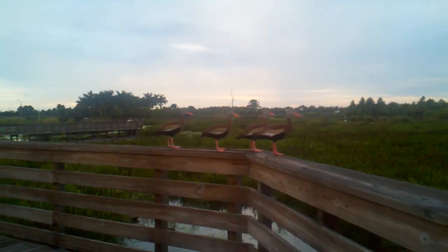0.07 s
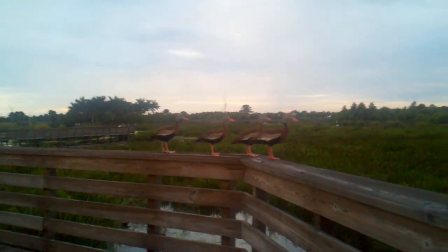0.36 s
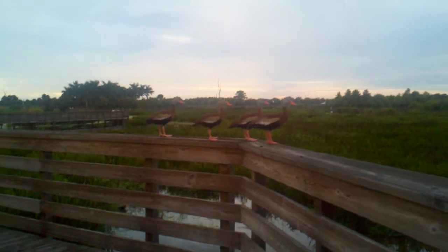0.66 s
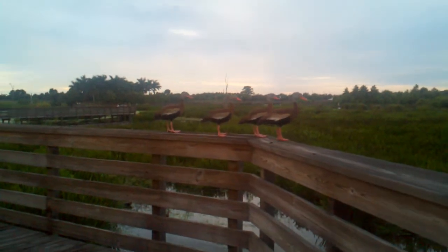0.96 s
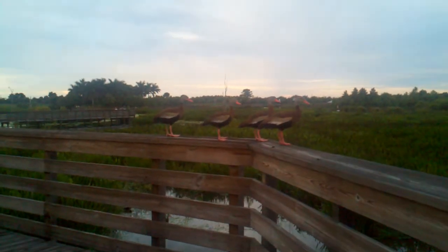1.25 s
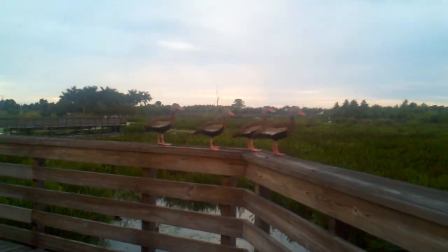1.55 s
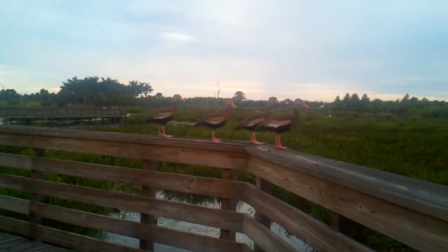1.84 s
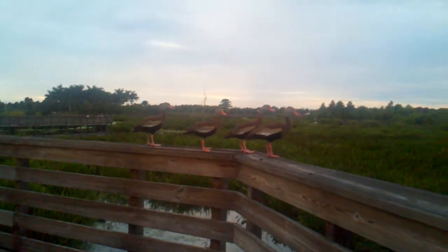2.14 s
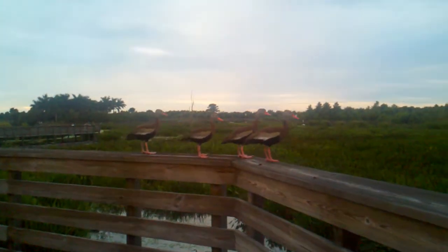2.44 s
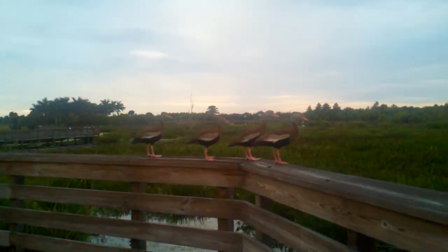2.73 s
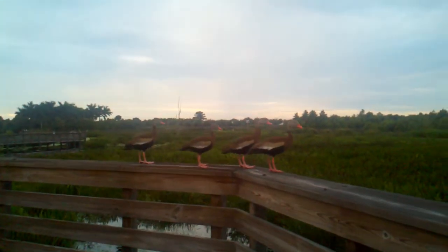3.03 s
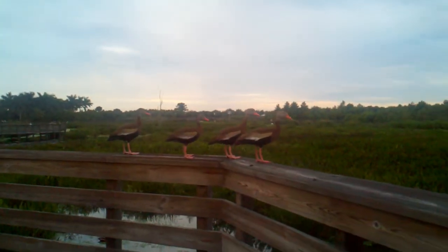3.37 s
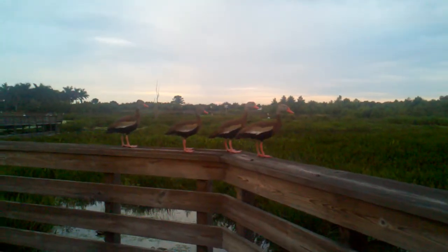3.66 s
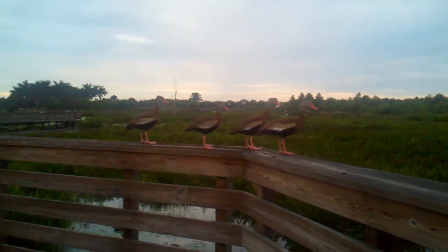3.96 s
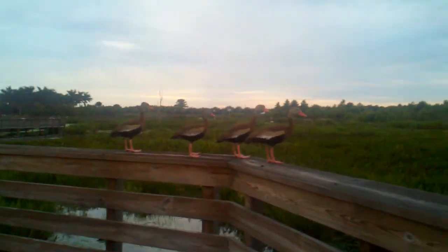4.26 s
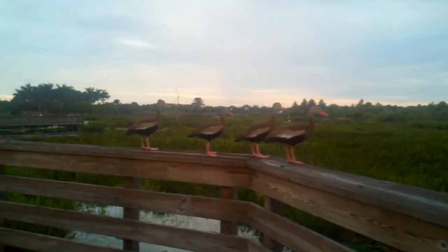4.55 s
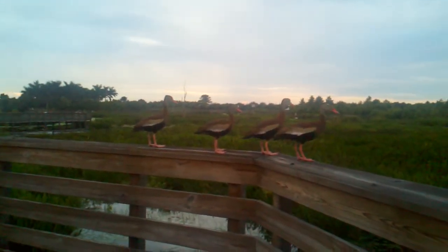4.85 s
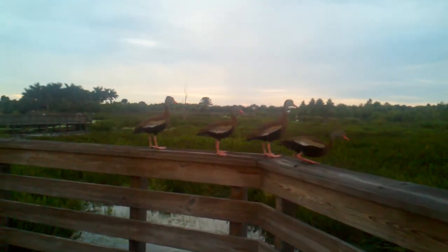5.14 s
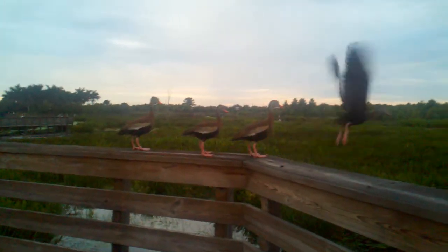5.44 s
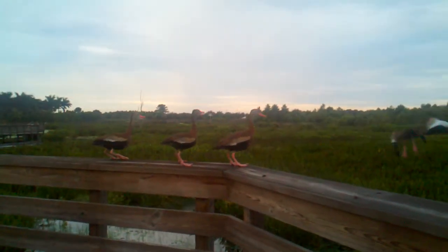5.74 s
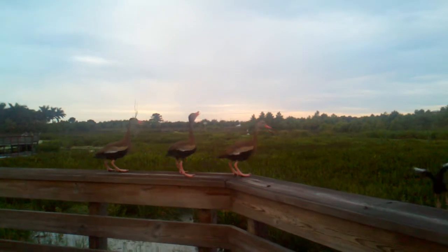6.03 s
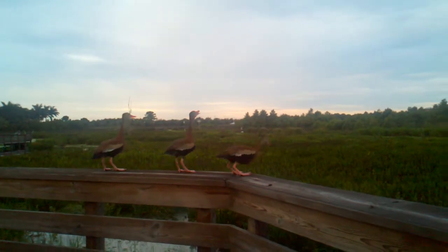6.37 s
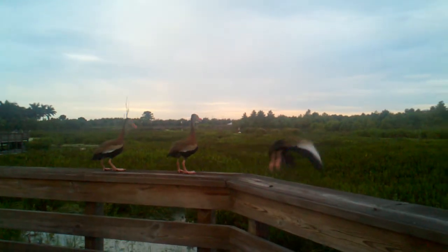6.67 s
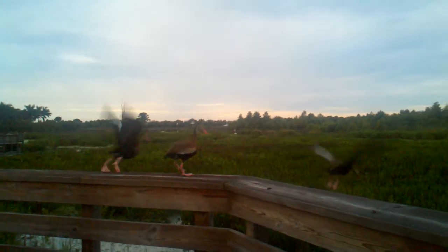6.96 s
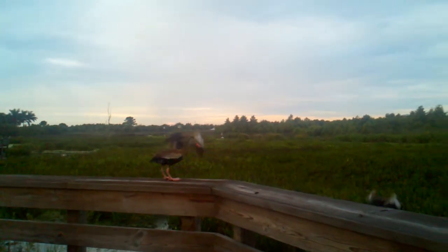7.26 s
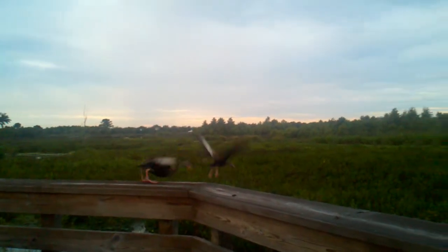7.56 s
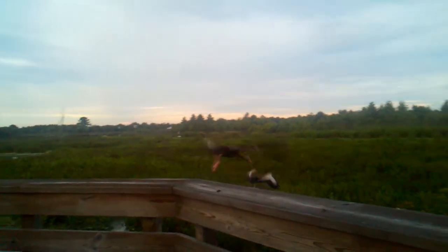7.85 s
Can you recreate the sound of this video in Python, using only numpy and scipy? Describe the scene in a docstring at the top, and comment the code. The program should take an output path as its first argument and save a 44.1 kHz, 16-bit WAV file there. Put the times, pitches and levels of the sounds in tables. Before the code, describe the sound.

A quiet outdoor marsh holds a low distant rumble, steady shrill insects and a faint, far rattling bird. About halfway through, a duck draws out one thin rising whistle. Then several ducks close to the microphone call at once in loud, quick whistles and raspy chirps, with a few light knocks and wing claps over a soft wash of noise. The calls thin out and fade at the end.

```python
"""A marsh at dusk: low distant rumble, shrill insects and a far rattling bird. Then whistling ducks on a
boardwalk rail: one long rising whistle, and all call at once as they fly off, over a soft wash of noise.
Each side of a duck's syrinx can sound its own pitch: one side alone gives a whistle; when both sound,
they mix into sum and difference tones. Deck, rails and reeds add a short echo."""
import sys
import numpy as np
from scipy import signal
from scipy.fft import rfft, irfft, next_fast_len
from scipy.io import wavfile
from scipy.ndimage import uniform_filter1d

SR = 44100
rng = np.random.default_rng(int(sys.argv[2]) if len(sys.argv) > 2 else 0)


def waveform_to_disk(signal):
    """Save audio, clipped to [-1, 1], as 16-bit WAV at the path in sys.argv[1]."""
    frames = np.transpose(np.atleast_2d(signal))
    scaled = np.clip(frames, -1, 1) * 32767
    samples = np.round(scaled).astype(np.int16)
    wavfile.write(sys.argv[1], SR, samples)


N = 357210
TIME, BINS = np.arange(N) / SR, np.fft.rfftfreq(N, 1 / SR)


def amp(db):
    """Decibels to gain."""
    return 10 ** (np.asarray(db) / 20)


def unit(x):
    """Scales to rms 1."""
    return x / np.sqrt(np.mean(x ** 2) + 1e-20)


def curve_at(points, hz):
    """Reads a curve on a log-frequency axis."""
    freqs, values = np.transpose(points)
    return np.interp(np.log(hz + 1), np.log(freqs + 1), values)


def add(mix, start, sound):
    """Mixes a sound in at a start time in seconds."""
    part = mix[round(start * SR):][:len(sound)]
    part += sound[:len(part)]


def noise(gain):
    """Noise of rms 1, shaped by a gain for each frequency."""
    return unit(irfft(rfft(rng.standard_normal(N)) * gain, N))


def noise_band(hz, width_hz):
    """A bell-shaped band of noise, rms 1."""
    return noise(np.exp(-((BINS - hz) / width_hz) ** 2 * 2))


def flutter(t, rate_hz):
    """A random modulator of rms about 1 that rolls off above the rate."""
    size = next_fast_len(len(t) + 4096)
    lowpass = np.exp(-(np.fft.rfftfreq(size, 1 / SR) / rate_hz) ** 2)
    return unit(irfft(rfft(rng.standard_normal(size)) * lowpass, size))[:len(t)]


def gesture(start, length, attack=.01, release=.008):
    """Times, progress 0-1 and a soft on-off gate of one call."""
    t = np.arange(0, length, 1 / SR)
    ramp = np.clip(np.minimum(t / attack, (length - t) / release), 0, 1)
    return start + t, t / length, np.sin(np.pi / 2 * ramp) ** 2


def arch(progress, crest, first, top, last, rise=1.7, fall=2.1):
    """Bends from first to top at the crest, then to last; a power of 1 is straight, 2 a parabola."""
    crest = np.clip(crest, .02, .98)
    before = np.maximum(1 - progress / crest, 0)
    after = np.maximum((progress - crest) / (1 - crest), 0)
    return top + (first - top) * before ** rise + (last - top) * after ** fall


def swell(progress, loudest, db, onset_db, ending_db):
    """Level envelope of a call; onset and ending are relative to its loudest moment."""
    return db + arch(progress, loudest, onset_db, 0, ending_db, rise=1.43, fall=1.48)


def membrane(t, hz, db, jitter, shimmer_db, rate_hz):
    """Phase and amplitude of one vibrating membrane, unsteady in pitch and strength."""
    phase = 2 * np.pi * np.cumsum(hz * (1 + jitter * flutter(t, rate_hz))) / SR
    return phase, np.sqrt(2) * amp(db + shimmer_db * flutter(t, rate_hz))


# EQ of the distant rumble: (frequency [Hz], relative level [dB])
RUMBLE_EQ = [(15, -59), (25, -20.5), (43, -18), (86, -13.5), (108, 1.5), (141, -4.5), (284, -1), (455, -3),
             (509, -2.5), (583, -3.5), (1600, -13), (2690, -15), (5400, -22.5), (7020, -57), (11900, -120)]
# fader ride of a far drone: (time [s], level [dB])
DRONE_RIDE = [(3.9, -100), (4.4, -78), (5.0, -74.5), (5.3, -86.5), (8.1, -88)]


def marsh(rumble_db=-68.5, hiss_db=-73, whine_db=-88, whine_hz=11084):
    """The bed: distant rumble, even hiss, a drone that swells once and a faint high whine."""
    ride_db = np.interp(TIME, [0, 4, 5, 7.2, 8.1], [.61, .41, 2.9, 1.83, 2.6]) + .55 * flutter(TIME, 4)
    rumble = amp(rumble_db + ride_db) * noise(amp(curve_at(RUMBLE_EQ, BINS)))
    hiss = amp(hiss_db) * noise(BINS > 5000)
    drone = amp(np.interp(TIME, *np.transpose(DRONE_RIDE))) * noise_band(325, 35)
    whine = np.sqrt(2) * amp(whine_db) * np.sin(2 * np.pi * whine_hz * TIME)
    return rumble + hiss + drone + whine


# shrill insect chorus and faint low hums: (centre [Hz], width [Hz], level [dB])
INSECT_BANDS = [(6373, 610, -70), (8770, 1600, -84)]
HUM_BANDS = [(118, 16, -85.5), (249, 46, -83.5)]


def insects_and_hums():
    """Steady bands of noise: insects on top, hums underneath."""
    return sum(amp(db) * noise_band(hz, width) for hz, width, db in INSECT_BANDS + HUM_BANDS)


def rattling_bird(level_db=-80.5, pulse_hz=13.5):
    """A distant bird's faint chatter: one bout of evenly pulsed noise."""
    bout = np.interp(TIME, [0, .4, 2.6, 2.7], [0, 1, 1, 0])
    pulses = np.cos(np.pi * pulse_hz * (TIME - 2.305)) ** 4
    return amp(level_db + flutter(TIME, 17)) * bout * unit(pulses) * noise_band(2320, 680)


# whistles from far over the marsh: (start [s], length [s], crest [share of length],
# first pitch [Hz], crest pitch [Hz], last pitch [Hz], starting level [dB])
FAR_CUES = [(1.689, 0.051, .6, 2820, 2630, 2500, -70), (2.982, .16, .4, 2720, 2760, 2560, -79),
            (3.079, .42, .3, 2590, 2610, 2580, -84), (5.521, 0.055, .45, 1790, 1680, 1520, -65.5),
            (7.233, 0.041, .35, 1720, 1610, 1530, -60.5), (7.7, .42, 0.22, 3320, 3326, 3040, -69),
            (7.781, .32, 0.28, 1686, 1620, 1550, -78.5)]


def far_birds(fade_db=-2.5):
    """Whistles blurred by distance: wavering sines that fade a little as they go."""
    out = np.zeros(N)
    for start, length, *contour, db in FAR_CUES:
        t, progress, gate = gesture(start, length, attack=.022, release=.02)
        hz = arch(progress, *contour)
        phase, gain = membrane(t, hz, db + fade_db * progress, jitter=.026, shimmer_db=4.5, rate_hz=350)
        add(out, start, gate * gain * np.sin(phase))
    return out


# fader ride of the noise wash: (time [s], level before trim [dB])
WASH_RIDE = [(5.3, -65), (5.48, -63.5), (5.58, -79), (5.8, -60.5), (5.98, -55), (6.05, -58.5), (6.3, -50.5),
             (6.8, -50.5), (6.9, -55), (7.12, -55.5), (7.2, -65), (7.6, -65), (7.75, -66)]
# EQ of the wash: (frequency [Hz], relative level [dB])
WASH_EQ = [(30, -16), (90, -5), (300, 3), (700, -3), (1400, -6.5), (3000, 1), (8000, -14.5), (15000, -34)]


def noise_wash(trim_db=-2):
    """A soft, unsteady wash of noise that swells under the loud calls."""
    ride_db = np.interp(TIME, *np.transpose(WASH_RIDE), left=-120, right=-120)
    return amp(trim_db + ride_db + .85 * flutter(TIME, 42.8)) * noise(amp(curve_at(WASH_EQ, BINS)))


# decay of the scatter from rails and reeds: (frequency [Hz], t60 [s])
REED_DECAY = [(300, 0.35), (3000, .55), (6000, 0.79), (14000, 0.068)]


def boardwalk_echo(dry, near_db=-14, tail_db=-21, near_t60=.194, taps_per_s=2000):
    """Adds quick reflections from the deck and rails, and a thin tail from the reeds."""
    t = np.arange(SR) / SR
    taps = rng.choice([-1., 1.], SR) * (rng.random(SR) < taps_per_s / SR) * (t > .002)
    near = taps * amp(-60 * t / near_t60)
    hz, when, spectra = signal.stft(taps[::-1], SR, nperseg=256)
    decay = amp(-60 * when / curve_at(REED_DECAY, hz)[:, None])
    tail = signal.istft(spectra * decay, SR, nperseg=256)[1][:SR]
    echo = amp(near_db) * near / np.linalg.norm(near) + amp(tail_db) * tail / np.linalg.norm(tail)
    return dry + signal.fftconvolve(dry, echo)[:N]


# ticks, foot knocks and wing claps: (time [s], peak level [dB], centre [Hz], t60 [s])
KNOCK_CUES = [(1.36, -44.5, 2120, 0.041), (1.465, -55, 1900, 0.018), (5.469, -50.5, 300, 0.28),
              (5.975, -34.5, 1530, 0.054), (6.583, -41.5, 748, 0.14), (6.617, -43, 1000, .08),
              (6.762, -47.5, 320, 0.176), (7.606, -46.5, 1350, 0.041), (7.689, -47.5, 6500, .01)]


def knocks():
    """Small impacts: dying noise bursts through one broad resonance each."""
    out, t = np.zeros(N), np.arange(SR // 8) / SR
    for start, db, hz, t60 in KNOCK_CUES:
        burst = rng.standard_normal(len(t)) * amp(-60 * t / t60)
        ring = signal.lfilter(*signal.iirpeak(hz, Q=1.8, fs=SR), burst)
        add(out, start, amp(db) * ring / abs(ring).max())
    return out


# EQ of the air that drives the calls: (frequency [Hz], relative level [dB])
BREATH_EQ = [(800, -33.5), (1400, -17), (2200, 4.5), (4000, -7), (8500, -1), (10500, -2.5), (12000, 0.5),
             (15500, -7.5)]


def breath(calls, air_db=-19.5, full_cry_db=-45.5):
    """A hiss that follows the treble of the calls, growing with how hard the flock cries."""
    treble = signal.sosfilt(signal.butter(4, 4200, "high", fs=SR, output="sos"), calls)
    cry = np.sqrt(abs(uniform_filter1d(uniform_filter1d(treble ** 2, size=1100), size=1100)))
    drive = np.clip(cry / amp(full_cry_db), .2, 1)  # soft whistles stay clean
    return amp(air_db) * cry * drive * noise(amp(curve_at(BREATH_EQ, BINS)))


# colour that throat and bill give to overtones: (frequency [Hz], gain [dB])
THROAT_EQ = [(1200, -34), (1600, -21), (1950, -7.5), (2400, -12.5), (3300, 16), (5000, 1), (6000, -1.5),
             (7400, -.5), (9300, -3.5), (10300, -9), (11300, -18.5), (12500, -21.5), (15500, -14)]


def partial(phase, hz, waver_db=1.8, waver_hz=50):
    """One overtone or mixing tone, coloured by the throat and wavering in strength on its own."""
    db = curve_at(THROAT_EQ, abs(hz)) + waver_db * flutter(phase, waver_hz)
    return amp(db) * np.sin(phase) * (hz < SR / 2)


def harmonics(t, phase, hz, over_db, tilt_db, fray, slack_db=26):
    """The fundamental and its overtones, which build up in turn and fray more the higher they lie."""
    # a slack, low-pitched membrane closes softly: its top overtones fade
    tilt_db = tilt_db - slack_db * np.clip(np.log2(2800 / hz), 0, 1)
    build = np.minimum((t - t[0]) / .016, 1) ** .6
    overtones = 0
    for k in range(2, 7):
        gain = amp(tilt_db * max(k - 3, 0) ** 1.4) * build ** (k - 1)
        overtones += gain * partial(k * (phase + fray * flutter(t, 574)), k * hz)
    return np.sin(phase) + amp(over_db) * overtones


def whistle(t, gate, hz, db, over_db, waver_db=5, tilt_db=-2):
    """One side of the syrinx sounds alone: a clean stack that frays and brightens when driven hard."""
    effort = np.clip((np.maximum(db, over_db) + 50) / 25, 0, 1)
    phase, gain = membrane(t, hz, db + .8 * flutter(t, 30), jitter=.0016, shimmer_db=.8, rate_hz=120)
    balance_db = over_db - db + waver_db * flutter(t, 60)
    fray = .02 + .12 * effort
    return gate * gain * harmonics(t, phase, hz, balance_db, tilt_db + 1.5 * effort, fray, slack_db=7.5)


def call_shape(start, length, crest, first_hz, top_hz, last_hz, loudest, peak_db, over_peak_db):
    """One short call: times, gate, arched pitch and the envelopes of fundamental and overtones."""
    t, progress, gate = gesture(start, length)
    hz = arch(progress, crest, first_hz, top_hz, last_hz)
    db = swell(progress, loudest, peak_db, onset_db=-18.5, ending_db=-28)
    over_db = swell(progress, .45, over_peak_db, onset_db=-7.5, ending_db=-10.5)
    return t, gate, hz, db, over_db


# path of the long whistle, levels before trims:
# (time [s], pitch [Hz], fundamental [dB], second harmonic [dB])
LONG_WHISTLE_PATH = [(4.24, 1880, -83, -74), (4.294, 1680, -96, -67), (4.538, 1964, -96, -67.5),
                     (4.564, 1990, -75, -65), (4.696, 2170, -80, -59), (4.794, 2454, -66, -60.5),
                     (4.832, 2480, -63.5, -59.5), (4.854, 2512, -68, -65), (4.978, 2524, -63, -50),
                     (5.008, 2510, -57.5, -53), (5.056, 2470, -64, -50.5), (5.148, 2449, -61, -54.5),
                     (5.16, 2430, -62, -59.5), (5.224, 2380, -62, -55), (5.274, 2316, -64, -62),
                     (5.29, 2330, -70, -47)]


def long_whistle(trim_db=.5):
    """One duck draws out a thin whistle that dips, climbs and levels off."""
    out = np.zeros(N)
    times, *columns = np.transpose(LONG_WHISTLE_PATH)
    t, _, gate = gesture(times[0], times[-1] - times[0])
    hz, db, second_db = [np.interp(t, times, column) for column in columns]
    over_db = second_db - curve_at(THROAT_EQ, 2 * hz)  # offsets the throat's gain on the second harmonic
    add(out, t[0], whistle(t, gate, hz, db + trim_db, over_db + trim_db, waver_db=1.7, tilt_db=-.5))
    return out


# one-voiced calls, levels before trim and throat EQ: (start [s], length [s], crest [share of length],
# first pitch [Hz], crest pitch [Hz], last pitch [Hz], loudest moment [share of length],
# fundamental [dB], overtones [dB])
WHISTLE_CUES = [(4.097, 0.1, 0.35, 2440, 3095, 2980, 0.23, -63.0, -81.0),
                (5.197, 0.052, 0.67, 2060, 2236, 1940, 0.93, -55, -56),
                (5.253, 0.06, 0.4, 2120, 3220, 3100, 0.67, -44, -58),
                (5.28, 0.06, 0.6, 2030, 2530, 2500, 0.45, -54.5, -53),
                (5.469, 0.13, 0.98, 1460, 1644, 1630.0, 0.53, -73, -76),
                (5.67, 0.097, 0.77, 1950, 2290, 2250.0, 0.59, -54.5, -63.5),
                (5.69, 0.06, 0.2, 2202, 2275, 1700, 0.3, -62, -54),
                (6.034, 0.13, 0.53, 2340.0, 2873, 2370.0, 0.6, -28, -46),
                (6.085, 0.15, 0.86, 2270, 2600, 2700, 0.1, -40.0, -48.5),
                (6.209, 0.23, 0.76, 2400, 3080, 2670, 0.87, -26.0, -42.5),
                (6.252, 0.14, 0.45, 2260.0, 2878, 2080, 0.54, -20, -41),
                (6.394, 0.12, 0.31, 3314, 3666, 3345, 0.81, -17.5, -29),
                (6.463, 0.19, 0.27, 2145, 2673, 2240.0, 0.17, -27.5, -42),
                (6.475, 0.207, 0.69, 3312, 3389, 2330, 0.86, -14.5, -36.5),
                (6.811, 0.086, 0.24, 3040, 3020, 2030.0, 0.42, -31, -49),
                (6.911, 0.1, 0.24, 2857, 3132, 1870, 0.56, -24.5, -38.5),
                (6.96, 0.071, 0.58, 3070, 3416, 3380, 0.48, -27.0, -50),
                (7.492, 0.12, 0.45, 2173, 3196, 3170.0, 0.35, -51.5, -63),
                (7.724, 0.0464, 0.55, 3300, 3086, 3210, 0.42, -50, -59.5)]


def short_whistles():
    """Quick arched whistles, each from one side of a syrinx."""
    out = np.zeros(N)
    for cue in WHISTLE_CUES:
        add(out, cue[0], whistle(*call_shape(*cue)))
    return out


# two-voiced calls: the low voice in the columns of WHISTLE_CUES, then the high voice's
# (crest [share of length], first pitch [Hz], crest pitch [Hz], last pitch [Hz],
# loudest moment [share of length], level before trim [dB])
CHIRP_CUES = [(1.661, 0.075, 0.66, 1486, 3170.0, 2640, 0.69, -58.5, -73, 0.37, 3280, 5560.0, 4970, 0, -62.0),
              (5.338, 0.087, 0.46, 2580, 3340, 2350.0, 0.4, -41, -53, 0.38, 2933, 3710.0, 2630.0, 0.61, -33.5),
              (5.62, 0.091, 0.41, 2426, 3055, 2210, 0.52, -41.5, -48, 0.38, 3790.0, 4306, 2810, 0.49, -30),
              (5.744, 0.089, 0.46, 2497, 2925, 2370, 0.51, -31, -45, 0.42, 3890.0, 4610.0, 3100, 0.63, -34),
              (5.842, 0.17, 0.61, 2720, 3530, 2200, 0.82, -29, -42.0, 0.72, 2820, 4430, 2700, 0.55, -31.0),
              (6.02, 0.2, 0.69, 2128, 3150, 2240, 0.9, -27.5, -43, 0.93, 2880, 5000, 5000.0, 0.67, -33.0),
              (6.201, 0.088, 0.34, 3040, 3570, 3485, 0.93, -20, -32.5, 0.41, 3203, 4410, 3720, 0.15, -28.0),
              (6.26, 0.13, 0.43, 3320.0, 3657, 2080, 0.42, -17, -35.5, 0.82, 3940, 5000, 4820, 0.45, -29),
              (6.404, 0.12, 0.59, 2290.0, 3540, 2124, 0.87, -24.0, -29.5, 1, 3236, 6790, 6210.0, 0.2, -22.0),
              (6.555, 0.092, 0.41, 3500.0, 3617, 1973, 0.63, -22.5, -29.5, 0.9, 3350, 5390, 5350.0, 0.24, -25.5),
              (6.635, 0.1, 0.45, 2184, 3750, 3060.0, 0.24, -21, -34.5, 0.88, 2700.0, 6160, 6050.0, 0.46, -30),
              (6.706, 0.13, 0.46, 2410.0, 3468, 2040, 0.62, -15, -29, 0.72, 3486, 6180.0, 5470.0, 0.29, -22.5),
              (6.74, 0.12, 0.51, 3040.0, 3070, 1717, 0.67, -23.5, -40, 0.44, 5850, 6220.0, 3600.0, 1, -37),
              (6.894, 0.083, 0.46, 2315, 3360.0, 1740.0, 0.62, -24.5, -32.5, 1, 3670, 5940, 5700.0, 0.29, -25.5),
              (7.052, 0.095, 0.39, 2340, 2993, 1570, 0.53, -32.0, -41.5, 0.66, 3415, 5390.0, 3420.0, 0.17, -35.5),
              (7.181, 0.078, 0.55, 2524, 2970, 2610, 0.98, -47, -56, 0.77, 3510.0, 4420, 4380.0, 0.43, -53),
              (7.229, 0.1, 0.47, 2736, 2690, 2360, 0.63, -42, -56.0, 0.35, 4400.0, 4310.0, 3850, 0.95, -62),
              (7.352, 0.078, 0.41, 2154, 2924, 1820, 0.68, -49.5, -56, 0.49, 3100.0, 4260, 3330, 0.24, -51),
              (7.459, 0.059, 0.34, 2370, 2740, 1760.0, 0.46, -51.5, -56.5, 0.74, 3260, 4270, 3510.0, 0.2, -54.5),
              (7.564, 0.052, 0.3, 2330, 2655, 2050, 0.35, -56, -60.5, 0.58, 2820, 4200, 3590, 0, -54)]


def chirp(cue, mixing_db=-3.5, difference_db=-9.5, rasp_db=-23):
    """Both sides of the syrinx sound: a clear low voice, a rougher high one and their mixing tones."""
    *low_voice, crest, first_hz, top_hz, last_hz, loudest, peak_db = cue
    t, gate, low_hz, low_db, over_db = call_shape(*low_voice)
    progress = np.linspace(0, 1, len(t))
    high_hz = arch(progress, crest, first_hz, top_hz, last_hz, rise=1.4)
    high_db = swell(progress, loudest, peak_db, onset_db=-15, ending_db=-30)
    # voices close in pitch pull at each other and turn rough; so does a duck in full cry
    rough = np.exp(-abs(high_hz - low_hz) / 550) + .3 * np.clip((over_db + 42) / 12, 0, 1)
    low_phase, low_gain = membrane(t, low_hz, low_db, .003 + .009 * rough, shimmer_db=1.6, rate_hz=300)
    high_phase, high_gain = membrane(t, high_hz, high_db, .007 + .026 * rough, shimmer_db=3.2,
                                     rate_hz=400)
    fray = .05 + .22 * rough
    balance_db = over_db - low_db + 1.96 * flutter(t, 250)
    sound = low_gain * harmonics(t, low_phase, low_hz, balance_db, tilt_db=-.2, fray=fray)
    sound += high_gain * (np.sin(high_phase) + amp(-19.5) * gate * partial(2 * high_phase, 2 * high_hz))
    # the weaker voice limits how strongly the two mix, once both are under way
    settled = np.minimum((t - t[0]) / .018, 1)
    mixing = amp(mixing_db) * settled * low_gain * high_gain / (low_gain + high_gain)
    for m, n, db in [(1, 1, 0), (2, 1, -3), (1, 2, -6)]:  # sum tones
        phase = m * low_phase + n * high_phase + 2 * fray * flutter(t, 700)
        sound += amp(db) * mixing * partial(phase, m * low_hz + n * high_hz)
    for m, n in [(-1, 2), (3, -1), (2, -1), (-1, 1)]:  # difference tones
        phase = m * low_phase + n * high_phase
        sound += amp(difference_db) * mixing * partial(phase, m * low_hz + n * high_hz)
    # turbulent air smears the voices into a rasp
    rasp = sum(flutter(t, 1400) * partial(k * low_phase, k * low_hz) for k in (2, 3))
    rasp += 1.2 * flutter(t, 800) * np.sin(low_phase)
    rasp_gain = amp(rasp_db) * (.14 + 2 * rough) * settled * (high_gain + amp(over_db) + .13 * low_gain)
    return gate * (sound + rasp_gain * rasp)


def ducks(trim_db=.3):
    """The flock up close: whistles and two-voiced chirps, wrapped in their breath."""
    calls = long_whistle() + short_whistles()
    for cue in CHIRP_CUES:
        add(calls, cue[0], chirp(cue))
    return amp(trim_db) * (calls + breath(calls))


def scene():
    """Mono mix: ducks, knocks and the noise wash in front of the marsh."""
    foreground = boardwalk_echo(ducks() + knocks()) + noise_wash()
    return (foreground + far_birds() + rattling_bird() + marsh() + insects_and_hums())[None]


def record(dry, cutoff_hz=15850):
    """A steep low-pass takes off the very top of the mix."""
    lowpass = signal.firwin(511, cutoff_hz, window=("kaiser", 9), fs=SR)
    return signal.oaconvolve(dry, lowpass[None], "same")


dry = scene()
out = record(dry)
waveform_to_disk(out)
```